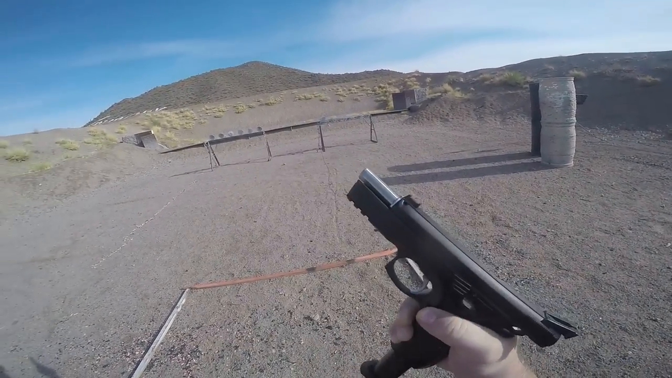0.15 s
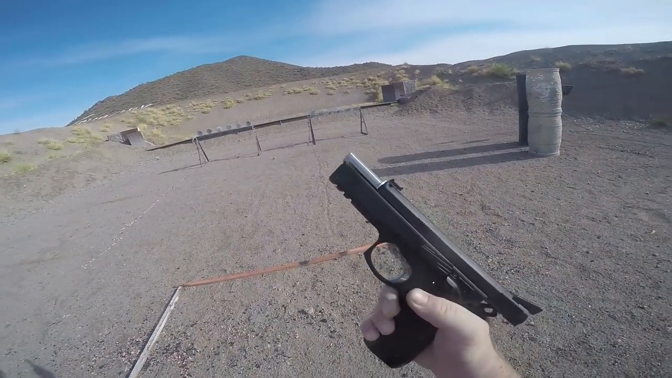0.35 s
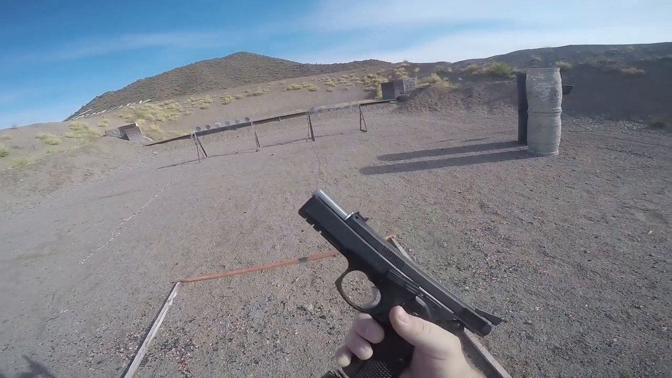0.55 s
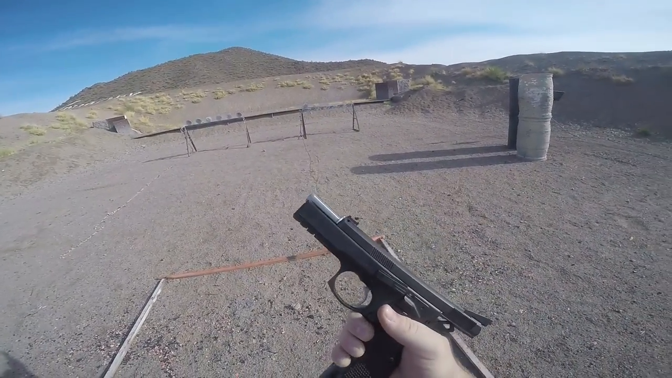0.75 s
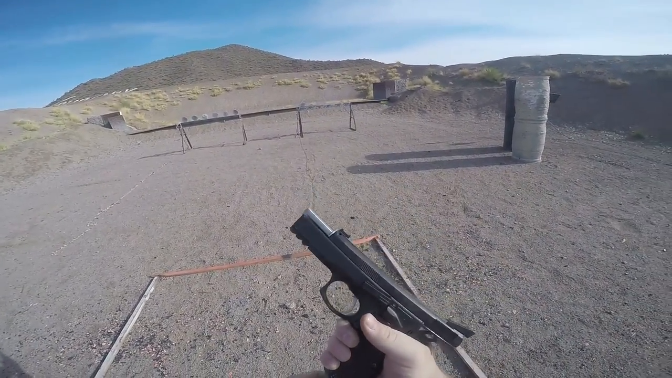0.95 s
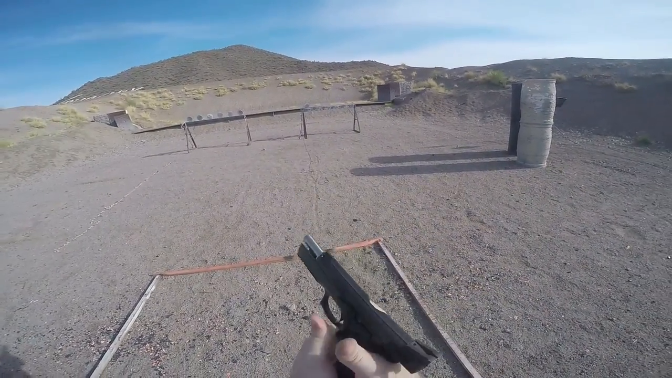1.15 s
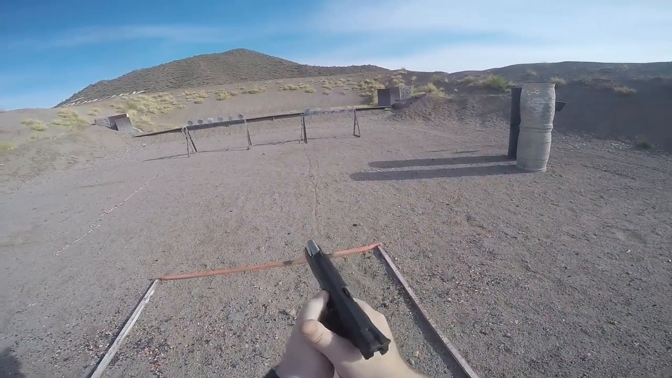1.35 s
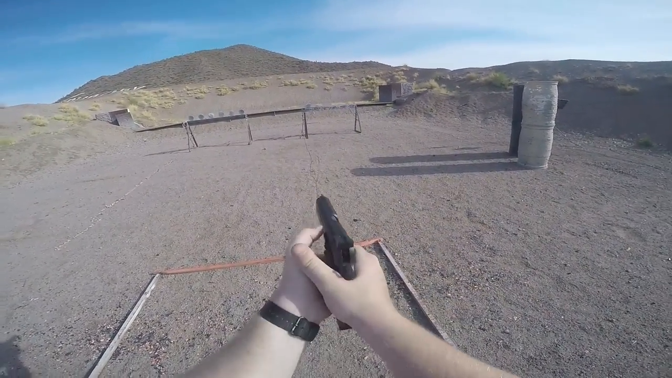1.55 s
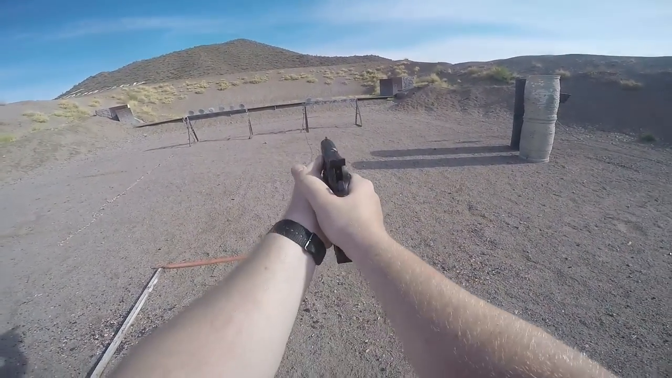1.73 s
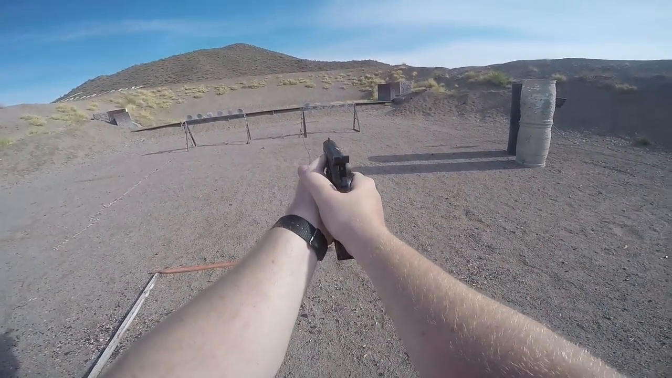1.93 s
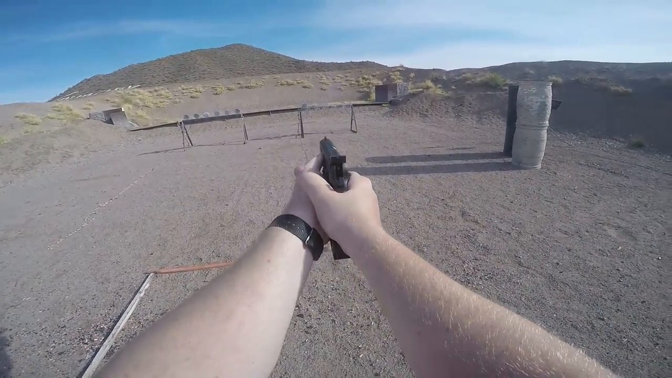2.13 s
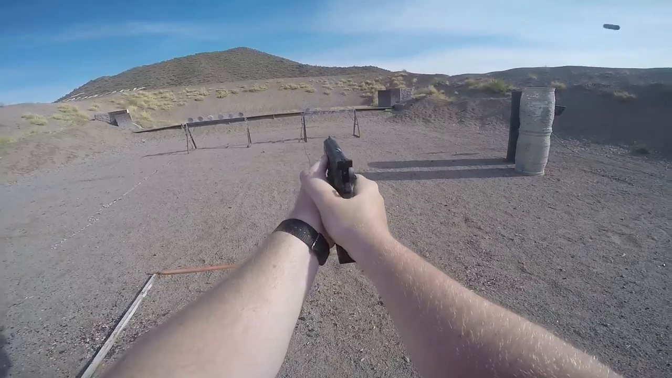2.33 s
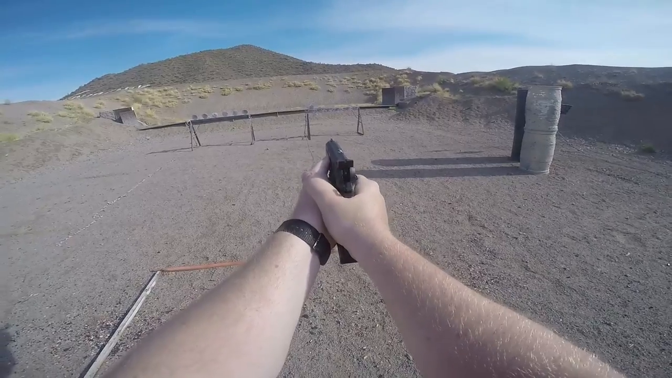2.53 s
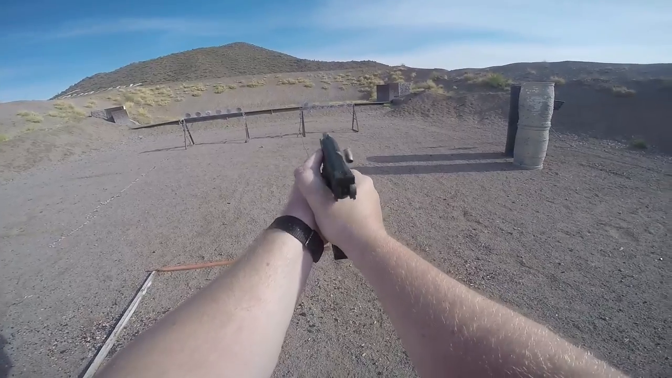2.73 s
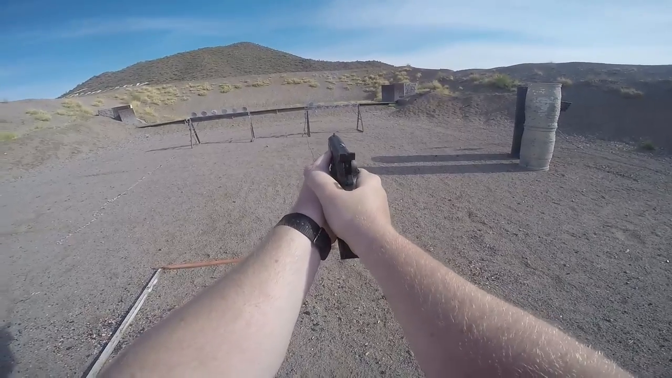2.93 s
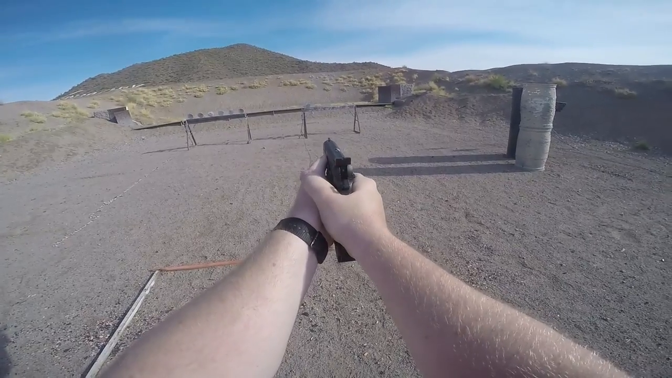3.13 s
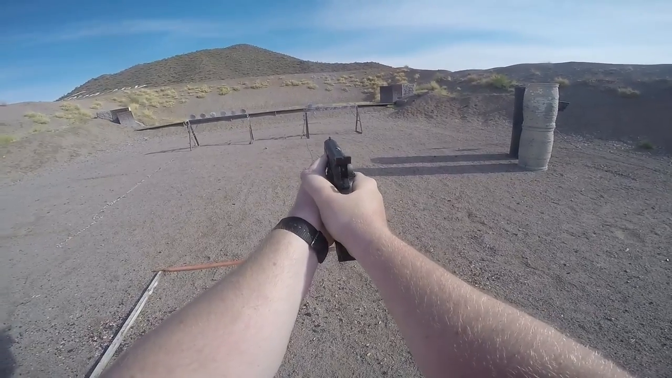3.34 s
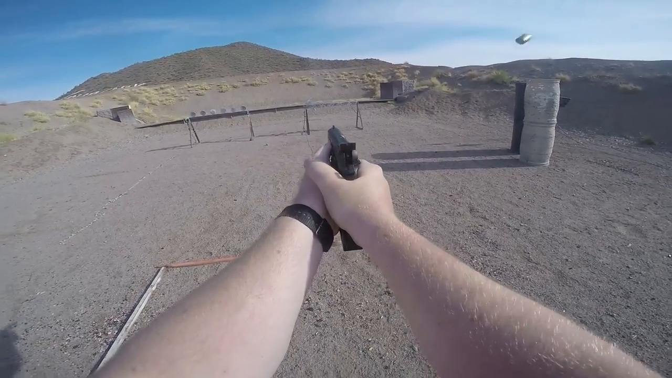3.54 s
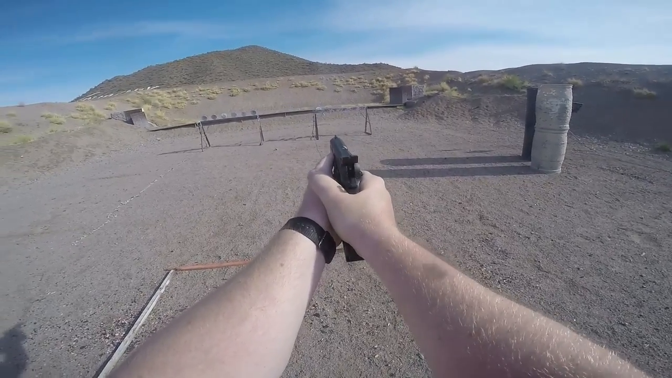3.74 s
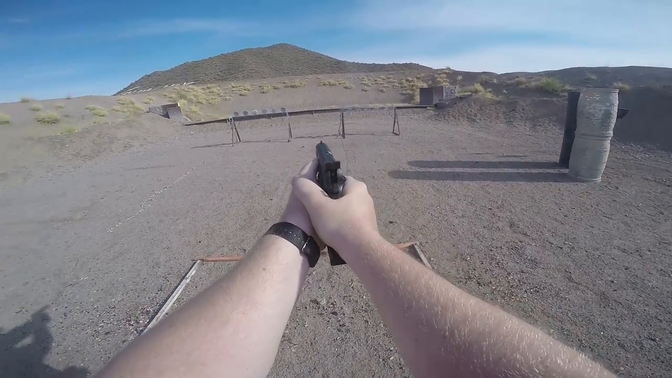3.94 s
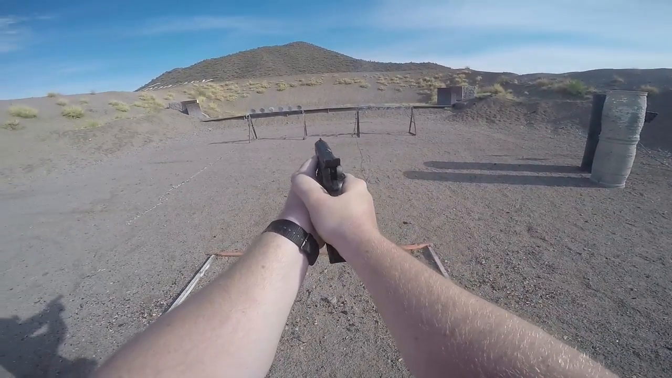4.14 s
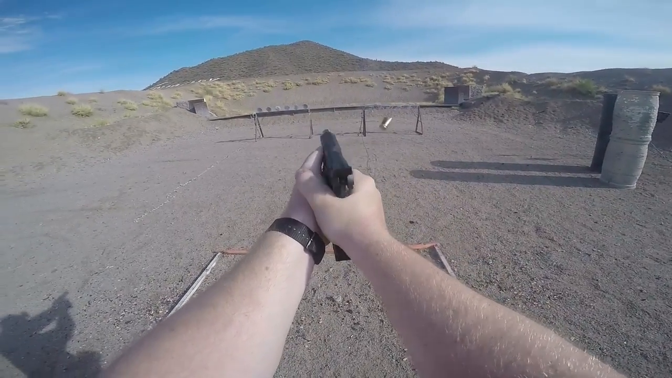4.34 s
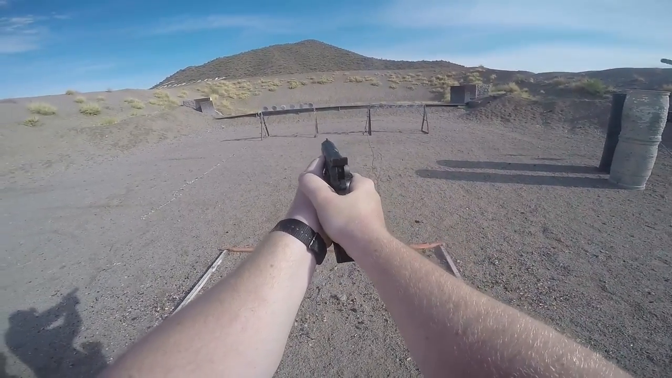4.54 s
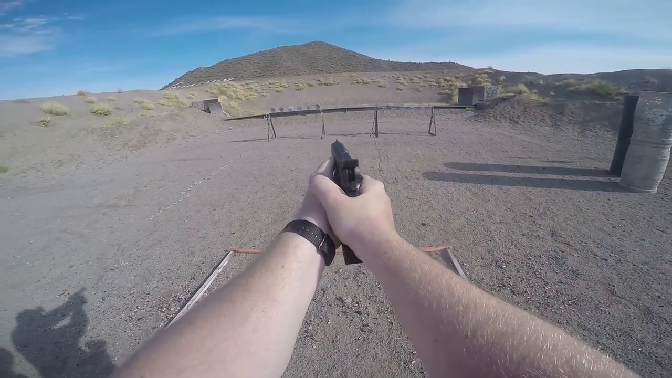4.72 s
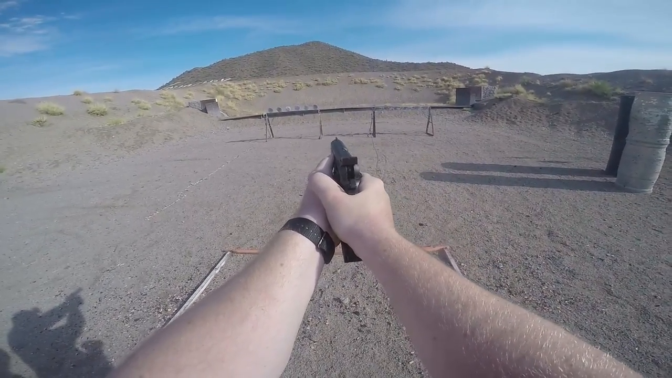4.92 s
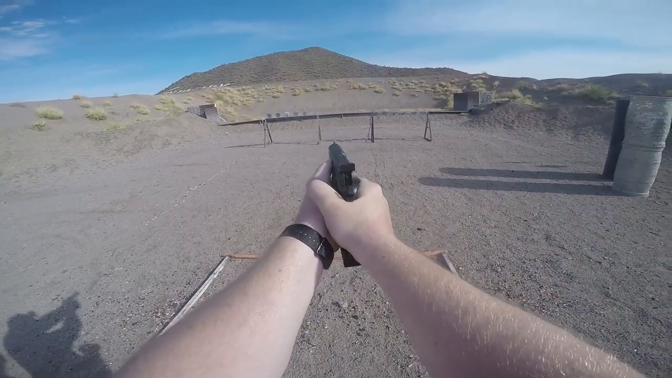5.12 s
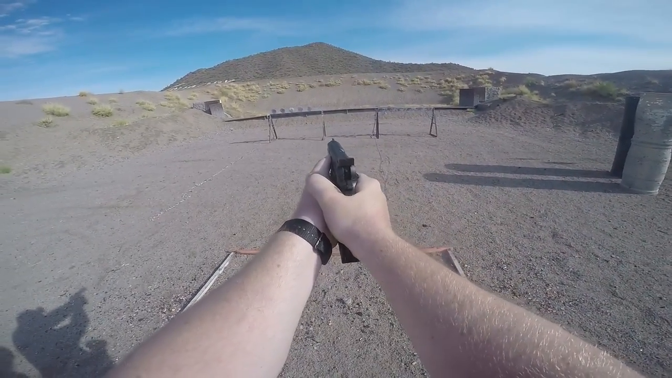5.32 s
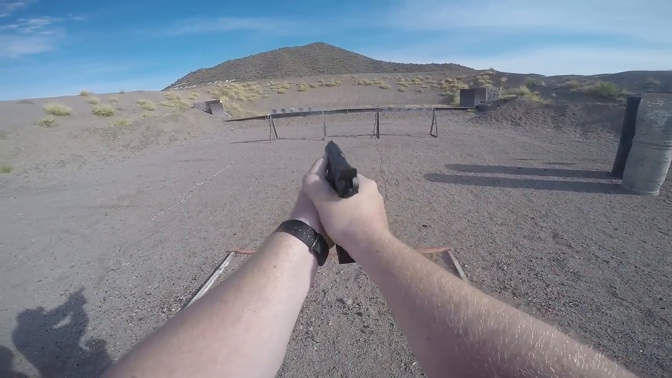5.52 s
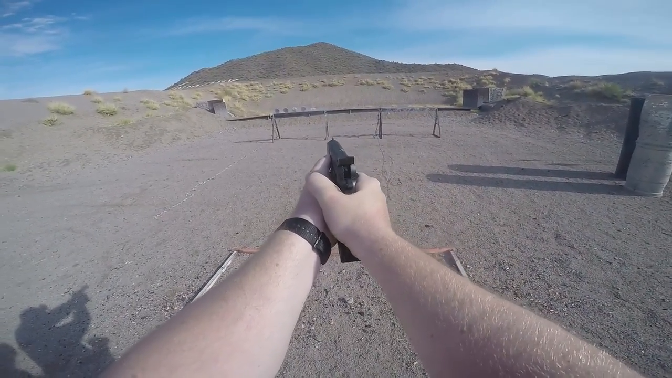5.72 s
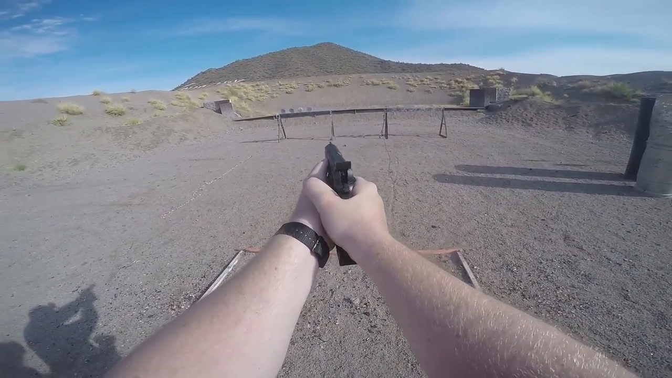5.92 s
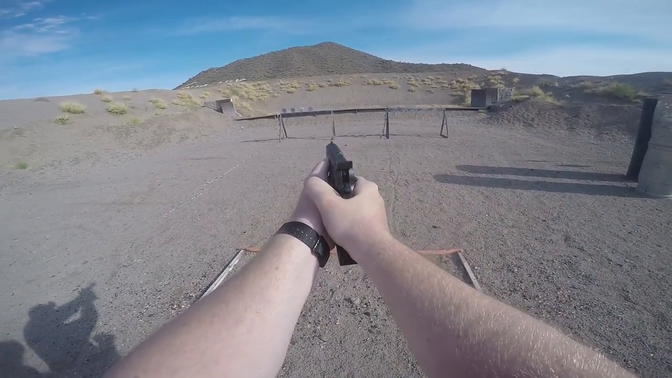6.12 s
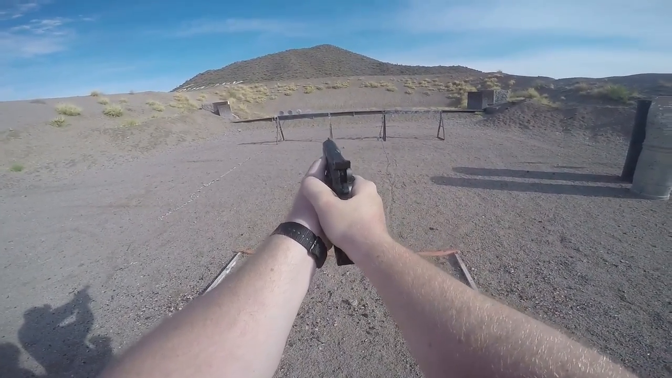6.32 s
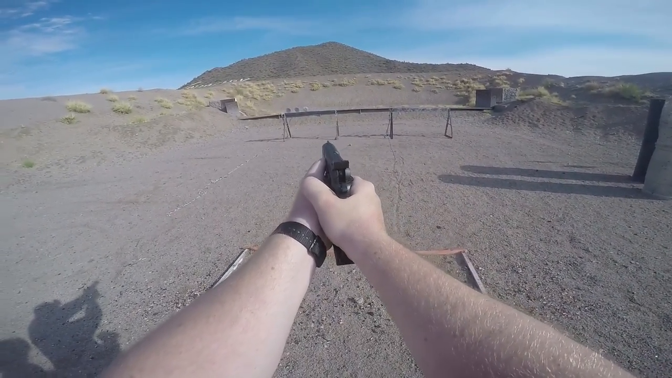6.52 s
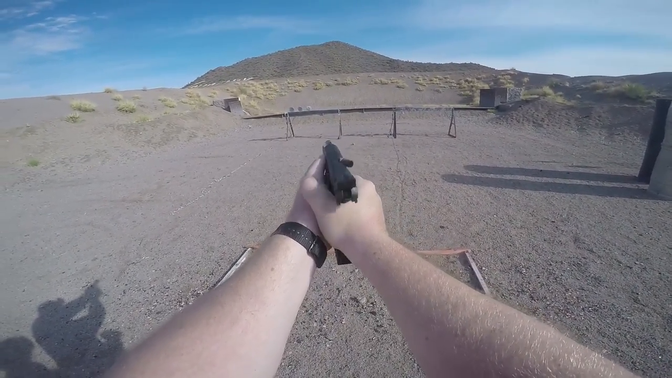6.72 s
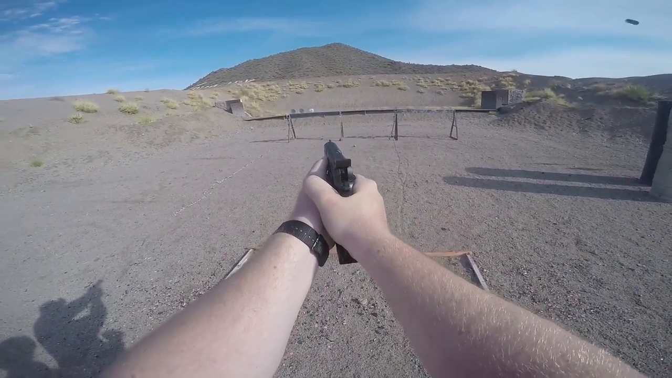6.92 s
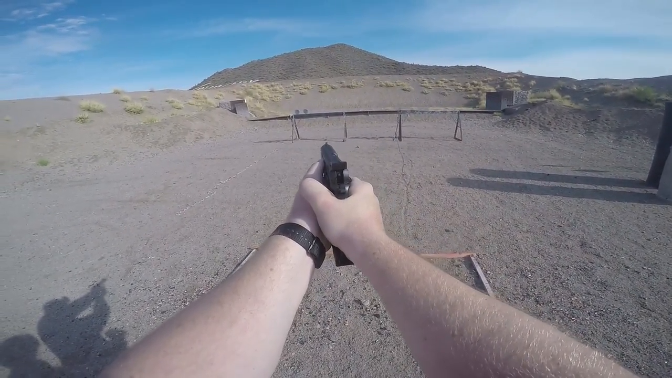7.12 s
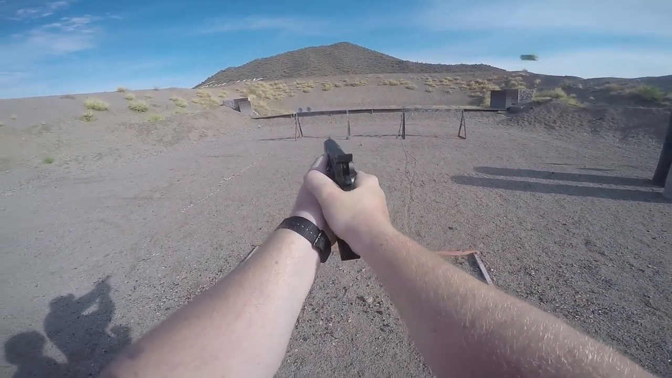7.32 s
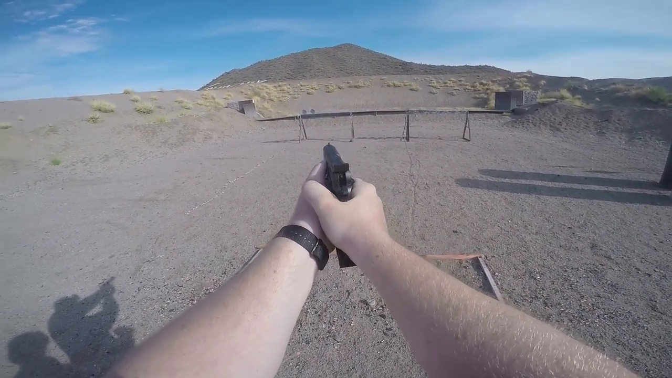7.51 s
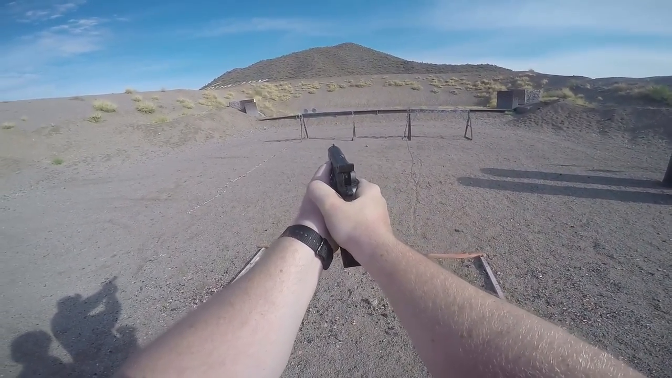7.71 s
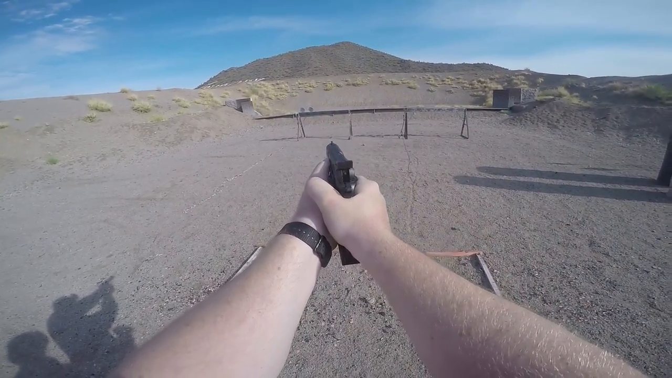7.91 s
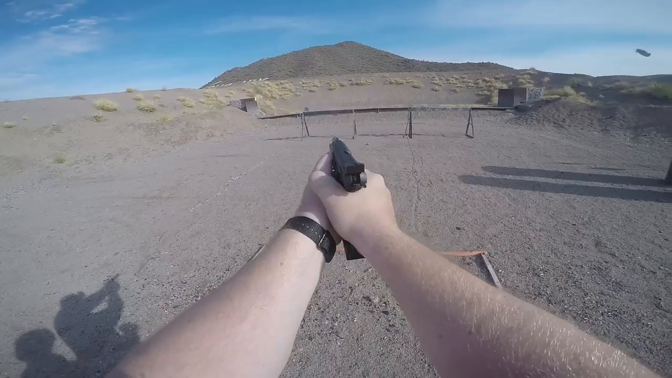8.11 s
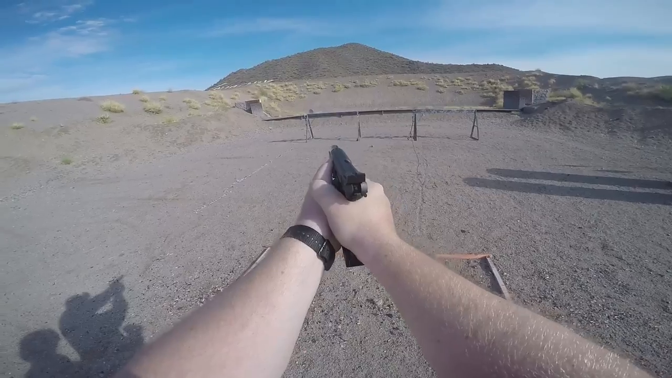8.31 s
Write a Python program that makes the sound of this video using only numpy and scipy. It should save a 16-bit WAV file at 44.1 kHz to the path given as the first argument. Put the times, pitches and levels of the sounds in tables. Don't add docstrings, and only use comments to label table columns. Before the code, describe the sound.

Close to a small head-worn microphone, a pistol is handled: faint finger ticks, a magazine clicking home, steel scrapes and a hard double-stage slide rack. Low wind and rumble swell, then ten pistol shots follow roughly every half to three quarters of a second, clipping harshly. Each echoes dully off earth banks outdoors; struck steel plates ping and clatter on their rack.

```python
import sys
import numpy as np
from scipy import signal
from scipy.fft import rfft, irfft
from scipy.io import wavfile
from scipy.ndimage import uniform_filter1d

SR = 44100
rng = np.random.default_rng(int(sys.argv[2]) if len(sys.argv) > 2 else 0)


def to_wav(sig):
    pcm = np.clip(np.atleast_2d(sig), -1, 1) * 32767
    pcm = np.round(pcm).astype(np.int16)
    wavfile.write(sys.argv[1], SR, pcm.T)


def rack_gain(trim_db):
    fader = np.asarray(trim_db, float)
    return 10 ** (fader / 20)


N = 368676
TIME = np.arange(N) / SR


def unit(x):
    return x / np.sqrt(np.mean(x ** 2))


def colour(x, points):
    hz, db = np.transpose(points)
    log_hz = np.log(np.arange(len(x) // 2 + 1) * SR / len(x) + 1)
    gain = rack_gain(np.interp(log_hz, np.log(hz), db))
    return unit(irfft(rfft(x) * gain, len(x)))


def band(x, hz, width):
    r = np.exp(-np.pi * width / SR)
    return signal.lfilter([1 - r, 0, r - 1], [1, -2 * r * np.cos(2 * np.pi * hz / SR), r * r], x)


def fade(t, t60):
    return (t >= 0) * np.exp(-np.log(1000) * np.clip(t, 0, None) / t60)


def walk(rate):
    k = int(SR / rate)
    steps = np.repeat(rng.standard_normal(N // k + 1), k)
    return 1.3 * uniform_filter1d(uniform_filter1d(steps, k), k)[:N]


def add(out, s, x):
    k = max(int(s * SR), 0)
    out[k:k + len(x)] += x[:len(out) - k]


# level in dB at the start, share of the gain creep, level in dB once ducked.
LAYERS = [
    (-64, 0.97, -61.5),
    (-66.5, 0.92, -68),
    (-78, 0.63, -85),
]


def layer_levels():
    creep_db_per_s, duck_start_s, duck_end_s = 11, 2.16, 2.3
    creep_db = creep_db_per_s * duck_start_s
    times = [0, duck_start_s, duck_end_s]
    return [np.interp(TIME, times, [db, db + share * creep_db, ducked_db]) for db, share, ducked_db in LAYERS]


# frequency in Hz, level in dB per Hz.
WIND = [(15, 1), (35, -2), (65, 0.5), (100, -1), (150, -23), (250, -55.5)]
# time in seconds, extra wind in dB.
GUSTS = [(0, -2.5), (.67, 1.5), (.84, 1.5), (1.29, 5.5), (1.68, 1), (2.0, 3), (3.4, 0.5), (4.3, -0.5),
         (8.36, -2.5)]


def wind(level_db):
    gust_db = np.interp(TIME, *np.transpose(GUSTS))
    return colour(rng.standard_normal(N), WIND) * rack_gain(level_db + gust_db + 1.6 * walk(9.3))


# frequency in Hz, level in dB per Hz.
RUMBLE = [(76, -31.5), (130, -2.5), (258, -11), (377, -3.5), (638, -1.5), (698, -4.5), (810, -15),
          (913, -15), (1400, -29), (1820, -55.5), (3080, -120)]


def rumble(level_db):
    return colour(rng.standard_normal(N), RUMBLE) * rack_gain(level_db + walk(3.7))


# frequency in Hz, level in dB per Hz.
HISS = [(700, -30), (1200, -1.5), (1900, -7), (2700, -2), (3600, -9), (5000, -12), (8000, -17),
        (16000, -34)]


def hiss(level_db):
    return colour(rng.standard_normal(N), HISS) * rack_gain(level_db + walk(36))


# frequency in Hz, width in Hz, level in dB over the rumble.
INSECTS = [(9545, 40, -33), (14277, 50, -36)]


def insects(rumble_db):
    songs = sum(rack_gain(db) * unit(band(rng.standard_normal(N), hz, width)) for hz, width, db in INSECTS)
    return songs * rack_gain(rumble_db)


# time in seconds, pitch in Hz, level in dB.
RICOCHET = [(3.2, 1244, -80), (3.25, 1214, -75), (3.5, 1068, -73), (3.52, 1040, -104.5)]


def ricochet():
    s, hz, db = np.transpose(RICOCHET)
    phase = 2 * np.pi * np.cumsum(np.interp(TIME, s, hz)) / SR
    return rack_gain(np.interp(TIME, s, db, -140, -140)) * np.sin(phase)


def air():
    wind_db, rumble_db, hiss_db = layer_levels()
    return wind(wind_db) + rumble(rumble_db) + hiss(hiss_db) + insects(rumble_db) + ricochet()


# start in seconds, level in dB, pitch in Hz, decay t60 in seconds.
KNOCKS = [(0.304, -57, 350, 0.098), (0.386, -66, 1460, 0.17), (0.676, -44, 570, 0.02),
          (0.676, -53, 250, .05), (0.838, -65, 1680, 0.46), (1.079, -38, 507, 0.059), (1.08, -45, 241, .04),
          (1.455, -28, 438, 0.076), (1.456, -41, 231, .04), (1.934, -32, 380, 0.046),
          (1.936, -33.5, 79.9, 0.2), (1.937, -40.5, 170, .1), (1.934, -57, 2610, 0.54)]


def knocks():
    out, t = np.zeros(N), np.arange(SR // 2) / SR
    for s, db, hz, t60 in KNOCKS:
        thud = 4 * np.sin(2 * np.pi * hz * t) * fade(t, 9 / hz) * np.clip(t * hz, 0, 1)
        noise = unit(band(band(rng.standard_normal(len(t)), hz, 500), hz, 500))
        add(out, s, rack_gain(db) * (thud + noise * fade(t, t60)))
    return out


# frequency in Hz, level in dB per Hz.
STEEL = [(180, -61.5), (300, -32), (487, -13), (1190, -7), (1730, -20.5), (2920, 0), (3720, -15.5),
         (4500, -3.5), (6380, -6), (7500, -19), (9750, -52.5), (16500, -120)]
EDGE = [(5000, -30), (7500, -4.5), (11000, -2), (14500, 0), (16500, -17)]
# start in seconds, end in seconds, level in dB, fade t60 in seconds, bright part in dB.
SCRAPES = [(0.674, 0.697, -45, 0.067, -1.5), (0.97, 1.056, -53, 0.059, -14), (1.058, 1.08, -35, 0.11, -13),
           (1.146, 1.233, -63.5, 0.33, -11), (1.315, 1.46, -65.5, .1, -21.5),
           (1.428, 1.466, -29, .04, -13.5), (1.469, 1.476, -39.5, 0.085, -5.5),
           (1.503, 1.678, -68, 0.44, -20)]


def scrapes():
    out = np.zeros(N)
    grit = rng.standard_normal(N) * rack_gain(3 * rng.exponential(size=N) + walk(150))
    body, edge = colour(grit, STEEL), colour(grit, EDGE)
    for start, end, db, t60, bright_db in SCRAPES:
        rise = np.clip((TIME - start) / (0.09 * t60), 0, 1)
        fall = fade(np.clip(TIME - end, 0, None), t60)
        out += rack_gain(db) * (body + rack_gain(bright_db) * edge) * rise * fall
    return out


# start in seconds, peak in dB, pitch in Hz.
FIDGETS = [(0.0024, -54.5, 2500), (0.1022, -52, 5070), (0.125, -45.5, 2570), (0.1674, -57, 3060),
           (0.204, -53.5, 2920), (0.2644, -56, 4440), (0.3817, -56.5, 1550), (0.4, -60, 2320),
           (0.845, -47, 2230), (1.0205, -35, 1050), (1.2181, -50.5, 1150), (1.2766, -47, 5500)]
# start in seconds, peak in dB, pitch in Hz, bright part in dB.
CLICKS = [(0.6049, -39, 4500, -8), (0.66, -23, 4040, -12), (0.6727, -22, 6800, 0.5),
          (0.688, -36.5, 2300, -20), (0.732, -52, 5700, -12), (0.822, -35.5, 5260, -8),
          (0.855, -50, 4500, -20), (0.8635, -43, 5870, -29), (0.927, -28.5, 2140, -7.5),
          (0.935, -40, 2200, -20), (0.9425, -46, 2200, -15), (0.9554, -23.5, 4400, -25),
          (0.9622, -34, 4500, -15), (0.9665, -25, 5270, -15), (0.979, -36, 4800, -20),
          (0.988, -40, 4800, -20), (0.9978, -32, 5620, -4), (1.0025, -32, 5500, -8),
          (1.0075, -30, 5560, -12), (1.0215, -37, 5200, -15), (1.0311, -33, 5430, -10),
          (1.049, -32, 5000, -15), (1.0592, -24, 6000, -4), (1.062, -9.5, 5100, -6),
          (1.0705, -24, 5200, -12.5), (1.0798, 2, 5370, -9), (1.371, -32.5, 4600, -12),
          (1.425, -12.5, 6300, 2.5), (1.4315, -21, 4500, -15), (1.4365, -19, 5500, -9.5),
          (1.4458, -9.5, 5170, -14.5), (1.4548, 2.5, 4400, -6), (1.4582, -7.5, 5000, -12),
          (1.4608, 0, 5440, -14.5), (1.4632, -6.5, 5400, -14.5), (1.4682, -12, 5530, -21)]


def clicks():
    out, t = np.zeros(N), np.arange(4000) / SR
    fidget_bright_db = -26
    for s, db, hz, bright_db in [(*row, fidget_bright_db) for row in FIDGETS] + list(CLICKS):
        t60 = .016 * (4500 / hz) ** 0.78
        noise = rng.standard_normal(len(t))
        ring = 1.29 * colour(noise, STEEL) + unit(band(noise, hz, 310)) + rack_gain(bright_db) * colour(noise, EDGE)
        add(out, s, rack_gain(db - 7.0) * ring * fade(t, t60) * np.clip(t / 0.00065, 0, 1))
    return out


# start in seconds, level in dB, rattle in seconds,
# t60 in seconds while rattling, pitch of this plate as a share of the usual one.
FALLS = [(3.891, -46, 0.17, 0.62, 0.93), (4.085, -49, 0.18, 0.48, 0.95), (5.341, -45.5, 0.18, 0.83, 0.99),
         (5.496, -48, 0.032, 0.84, 0.97), (5.894, -48.5, 0.17, 3.1, 1), (6.551, -48.5, 0.14, 2, 1),
         (7.13, -47, 0.14, 1.56, 1), (8.354, -48, .1, 0.27, 0.96)]
# frequency in Hz, level in dB per Hz.
RACK = [(410, -15.5), (750, 8), (1450, -3.5), (2050, 4), (2850, 6.5), (3350, -1.5), (4050, -6),
        (4600, -2.5), (6900, -9.5), (7400, -16), (14000, -23.5)]
# frequency in Hz, width in Hz, level in dB.
RACK_MODES = [(895, 25, -9), (2070, 35, -8.5), (2340, 36, -4), (2590, 30, -6), (2910, 25, 0),
              (3170, 33, -9), (3670, 37, -10.5), (4210, 33, -19.5), (4700, 80, -16), (4710, 16, -16),
              (4870, 25, -17.5), (5500, 32, -14.5), (6500, 60, -22), (6660, 48, -20)]


def plate_falls():
    out, t, rattle = np.zeros(N), np.arange(SR) / SR, walk(54)
    for s, db, span, t60, pitch in FALLS:
        k = int(s * SR)
        noise = rng.standard_normal(SR) * rack_gain(0.37 * rattle[k - SR:k])
        modes = 0
        for hz, width, mode_db in RACK_MODES:
            detuned = hz * rng.normal(pitch, .004)
            modes = modes + rack_gain(mode_db) * unit(band(noise, detuned, width)) * fade(t, 3000 / hz)
        clank = colour(noise, RACK) * (0.55 + fade(t, 0.096))
        shape = fade(t, t60) * fade(np.clip(t - span, 0, None), 0.42) * np.clip(t / 0.0035, 0, 1)
        add(out, s, rack_gain(db) * (clank + 0.55 * modes) * shape)
    return out


# start in seconds, pitch in Hz, level in dB, decay t60 in seconds, time facing in seconds.
RINGS = [(3.592, 7402, -60, 3, .19), (3.81, 7402, -72, 1, .07), (5.083, 2848, -27, .26, .11),
         (5.2, 2848, -59, 2, .15), (5.39, 2848, -45, .7, .12), (5.083, 12070, -44, .25, .15),
         (5.12, 4705, -54, 2.5, .19), (5.36, 5760, -63, 1, .2), (5.636, 7445, -51, .5, .07),
         (5.714, 7445, -51, 1.5, .11), (5.636, 4484, -43, .2, .045), (5.685, 4484, -55, .6, .05),
         (5.75, 4484, -56, 1, .1), (5.636, 10720, -50, .3, .15), (5.636, 12340, -54, .25, .15),
         (5.95, 5750, -63, .7, .2), (6.287, 2116, -36, .25, .1), (6.39, 2116, -60, 1, .1),
         (6.287, 7908, -45, .27, .14), (6.287, 2972, -46, .27, .15), (6.58, 4720, -61, 1.5, .2),
         (6.832, 10650, -53, .45, .15), (6.832, 12350, -50, .25, .15), (6.85, 7450, -61, .8, .13),
         (6.89, 4500, -60, 1, .15), (7.14, 4600, -60, .8, .2)]
# start in seconds, pitch in Hz, level in dB, decay t60 in seconds, length in seconds.
PARTS = [(1.2, 1430, -64, .7, .2), (0, 400, -65, .9, .2), (.165, 3020, -70, .3, .15),
         (.39, 2350, -72, .36, .2), (.385, 1500, -70, .36, .2)]


def ringing_steel():
    out, t = np.zeros(N), np.arange(SR) / SR
    for s, hz, db, t60, faces in list(RINGS) + list(PARTS):
        swing = 1 + 0.1 * np.sin(2 * np.pi * (rng.uniform(3.0, 13) * t + rng.random()))
        twin_hz = hz + 16 * rng.uniform(0.2, 1.8)
        twin = .15 * np.sin(2 * np.pi * (twin_hz * t + rng.random()))
        swell = 1 - np.exp(-t / (.06 * faces))
        shape = swell * fade(t, t60) * np.exp(-(t / faces) ** 4)
        add(out, s, rack_gain(db) * swing * shape * (np.sin(2 * np.pi * hz * t) + twin))
    return out


# delay in ms, level in dB under the main bank, pitch in Hz, width in Hz.
BANKS = [(102.5, 0, 465, 420), (108.6, -14, 480, 420), (118.8, -16, 225, 290), (120, -27, 1000, 900),
         (100.8, -15, 160, 250), (98.5, -25, 650, 500), (25.3, -3.5, 680, 850), (30.5, -8, 500, 500)]
RIDGES = [(139, -28.5, 330, 660), (155, -31, 280, 240), (186, -30.5, 450, 600), (189, -33, 645, 350),
          (200, -26, 510, 510), (209, -28.5, 417, 340), (220, -35.5, 490, 710), (250, -33.5, 615, 430),
          (253.6, -28.5, 274, 410), (268, -30.5, 520, 520), (296, -41, 246, 200), (317, -41, 420, 260),
          (328, -32, 450, 380), (393, -40, 440, 420), (464, -46.5, 350, 360)]


def bank_echoes(ms):
    out = 0
    for at, db, hz, width in list(BANKS) + list(RIDGES):
        ring = np.diff(1. * (ms > at), prepend=0)
        for _ in range(4):
            ring = band(ring, hz, width)
        out = out - rack_gain(db) * ring / np.abs(ring).max()
    return out


# frequency in Hz, early level in dB, early t60 in seconds,
# late level in dB, late t60 in seconds.
TAIL = [(56.7, -25, 0.072, -57, 1.7), (170, -24, 0.18, -49.5, 1.3), (310, -20, 0.16, -48, 1.5),
        (539, -18, 0.17, -44.5, 1.3), (810, -28, 0.32, -77.5, 11), (1420, -29.5, 0.074, -60.5, 0.18),
        (2680, -28, 0.061, -51.5, 0.6), (5596, -32.5, 0.044, -53.5, 0.48), (8150, -37, 0.026, -56, 0.32),
        (13300, -46, 0.078, -58.5, 0.6)]


def scattered_tail(scatter, t):
    out = 0
    for hz, db, t60, late_db, late_t60 in TAIL:
        wait = .04 if hz > 4000 else .1
        late = rack_gain(late_db) * fade(t - wait, late_t60) * np.clip((t - wait) / 0.013, 0, 1)
        noise = scatter
        for _ in range(3):
            noise = band(noise, hz, 0.63 * hz)
        out = out + (rack_gain(db) * fade(t - .012, t60) + late) * unit(noise)
    return out


def crack(t, hz, t60, bright):
    noise = rng.standard_normal(len(t))
    body = unit(band(band(noise, hz, 0.77 * hz), hz, 0.77 * hz))
    edge = unit(np.diff(noise, prepend=0))
    return fade(t, t60) * (body + bright * edge) / 3.58


# delay in ms, level in dB, decay t60 in ms, pitch in Hz.
TICKS = [(168, -54, 6, 11000), (183, -40, 7, 4500), (235, -40, 8, 2400), (262, -46, 7, 3000),
         (300, -45, 7, 8000)]


def post_ticks(x, t):
    for ms, db, t60, hz in TICKS:
        level = rack_gain(db + 2.2 * rng.standard_normal())
        add(x, ms / 1000, level * crack(t[:1000], hz, t60 / 1000, (hz / 10000) ** 2))


def bullet_hit(x, t, hit_db, lumps):
    hit_s = .0525
    slap = crack(t[:4000], 2000, .022, .4)
    slap = slap + 0.52 * crack(t[:4000], 3200, 0.076, .08) + 0.43 * crack(t[:4000], 750, 0.03, 0)
    add(x, hit_s, rack_gain(hit_db) * slap)
    add(x, hit_s + .0055, rack_gain(hit_db - 4) * crack(t[:4000], 3500, 0.013, 0.79))
    add(x, hit_s, rack_gain(hit_db - 36) * crack(t[:20000], 3400, 0.96, .2) * lumps[:20000])


# delay in ms, level in dB, decay t60 in ms, pitch in Hz.
CRACKS = [(0, 7, 9, 3000), (.8, 15, 11, 2900), (.4, 10, 18, 1100), (1.2, 8, 12, 5200), (.7, -2, 8, 13000),
          (8, -9, 7, 14000), (7.4, 0, 10, 4500), (7.6, -8, 8, 8500), (11.5, -20, 20, 11000),
          (19.5, -24, 8, 10000), (.3, 2, 10, 8000), (12, -16, 20, 3000), (19, -16, 14, 4500),
          (24.5, -20, 12, 4000), (25.8, -13, 20, 4500), (29, -16, 25, 2600), (35, -27, 60, 1600),
          (36, -25, 70, 2900), (43, -28, 30, 5000), (63, -33, 80, 2200), (70, -32, 30, 4500),
          (97.5, -33, 12, 2200), (101, -27, 45, 2600), (103, -38, 25, 4500), (121, -38, 25, 3500)]


def sharp_arrivals(x, t, treble_db):
    for ms, db, t60, hz in CRACKS:
        level = rack_gain(db + treble_db * (hz > 7999) + 1.9 * rng.standard_normal())
        add(x, ms / 1000, level * crack(t[:2000], hz, t60 / 1000, 0.22 * np.exp(-ms / 60)))


# start in ms, length in ms, size.
PUSHES = [
    (.35, .55, -1.2),
    (.87, 1.6, 1.2),
    (2.96, 2.46, 2.6),
    (4.6, 3.0, 2.1),
    (7.4, 1.05, 1.8),
    (8.57, 1.48, 2.8),
    (12.97, 1.2, .3),
]


def blast(ms, longer):
    push = 0
    for i, (at, span, size) in enumerate(PUSHES):
        length = span + longer * (i == 3)
        push = push + size * np.sin(np.pi * np.clip((ms - at) / length, 0, 1))
    r = np.exp(-np.pi * 47 / SR)
    push = signal.lfilter([1, -2, 1], [1, -2 * r * np.cos(2 * np.pi * 7.75 / SR), r * r], push)
    return push + .43 * band(push, 533, 51)


# start in seconds, after-flow longer by ms, hit on steel or dirt in dB,
# bank echo in dB, extra treble in dB.
SHOTS = [(2.224, 0.58, -17.5, -5.5, 6), (2.7891, 0.12, -20.5, -7.5, 1.5), (3.5205, 0, -13.5, -8, -1.5),
         (4.367, 0.17, -18, -6, -2.5), (5.0301, 0.043, -13.5, -6, 0.25), (5.5827, 0, -17, -10, -3),
         (6.2341, 0.078, -14, -7.5, -2), (6.779, 0.042, -18.5, -10.5, -3.5), (7.3121, 0, -23.5, -10.5, -2),
         (8.0034, 0.044, -14, -9, 4)]


def shots():
    out, t = np.zeros(N), np.arange(SR) / SR
    ground, echo = rng.standard_normal(SR), bank_echoes(t * 1000)
    lumps = rack_gain(2 * walk(160)[:SR])
    for s, longer, hit_db, echo_db, treble_db in SHOTS:
        scatter = (ground + .5 * rng.standard_normal(SR)) * lumps
        x = rack_gain(echo_db) * echo
        add(x, 0, blast(t[:8000] * 1000, longer))
        x += scattered_tail(scatter, t)
        sharp_arrivals(x, t, treble_db)
        bullet_hit(x, t, hit_db, lumps)
        post_ticks(x, t)
        add(out, s - .0003, x)
    return out


def scene():
    handling = knocks() + scrapes() + clicks()
    plates = plate_falls() + ringing_steel()
    return (air() + handling + plates + shots())[None]


def top_cut(x):
    return signal.sosfilt(signal.butter(12, 16570, fs=SR, output="sos"), x)


def record(dry):
    clipped = dry / (1 + dry ** 4) ** .25
    top = signal.ellip(8, .3, 45, 15300, fs=SR, output="sos")
    capped = np.clip(signal.sosfilt(top, clipped), -.925, .925)
    edge = signal.butter(10, 16400, fs=SR, output="sos")
    return top_cut(signal.sosfilt(edge, capped))


dry = scene()
out = record(dry)
to_wav(out)
```